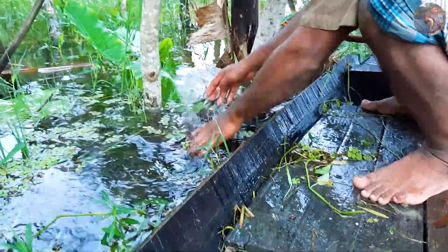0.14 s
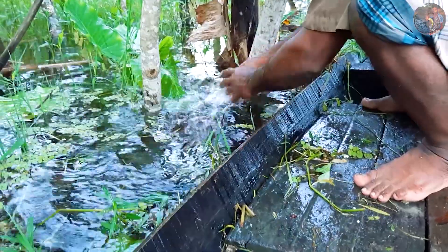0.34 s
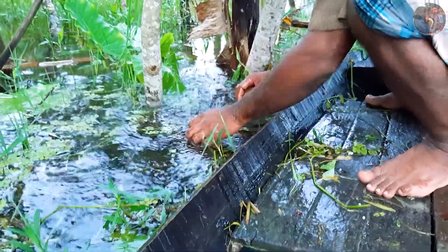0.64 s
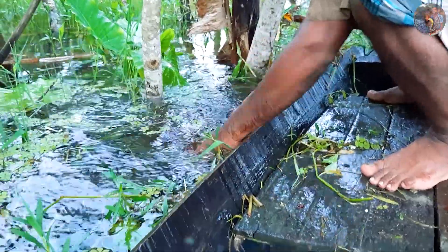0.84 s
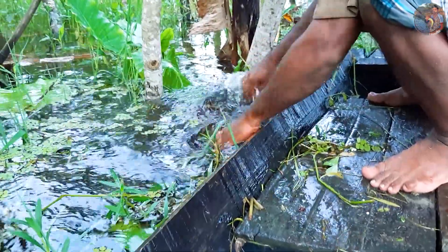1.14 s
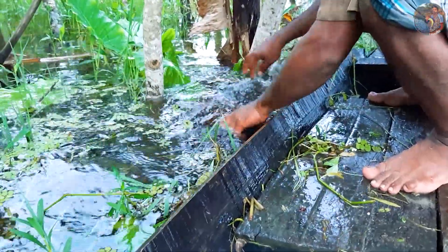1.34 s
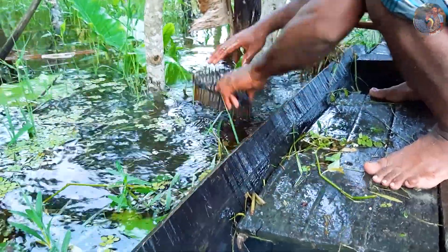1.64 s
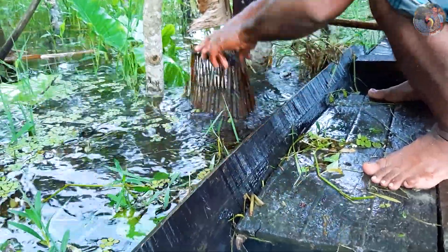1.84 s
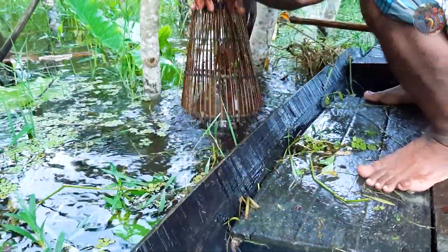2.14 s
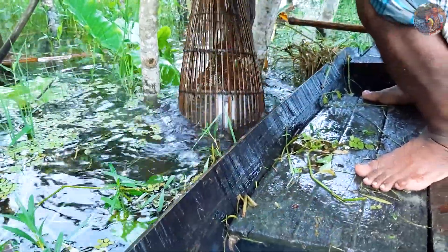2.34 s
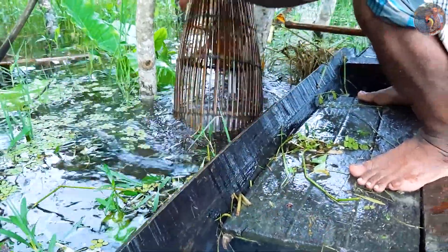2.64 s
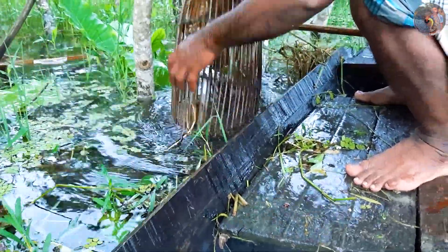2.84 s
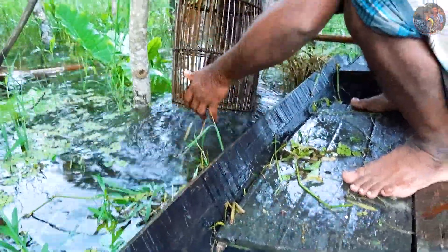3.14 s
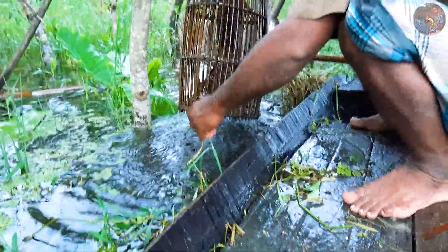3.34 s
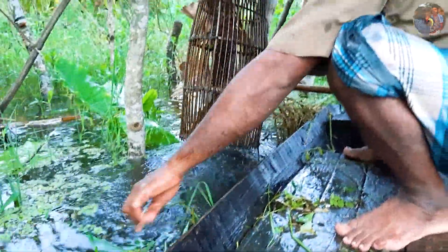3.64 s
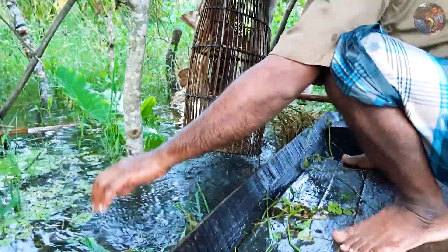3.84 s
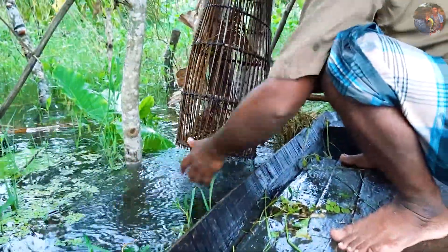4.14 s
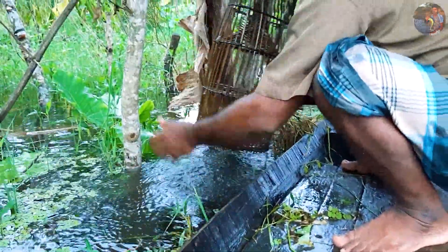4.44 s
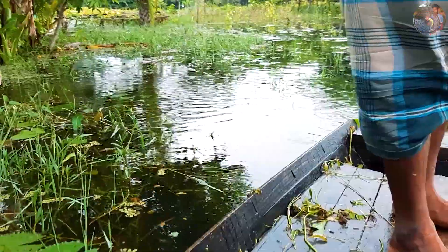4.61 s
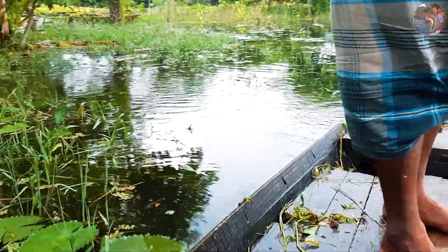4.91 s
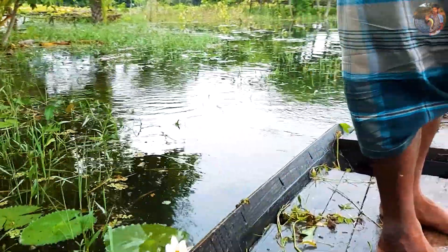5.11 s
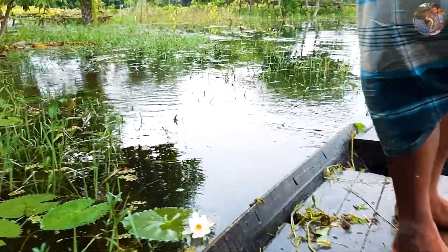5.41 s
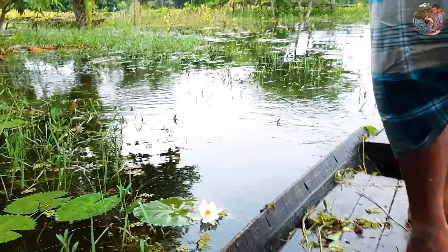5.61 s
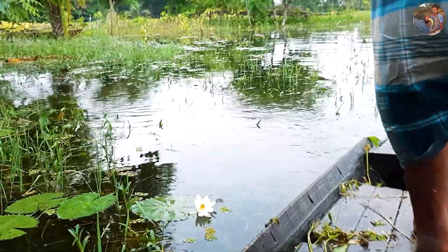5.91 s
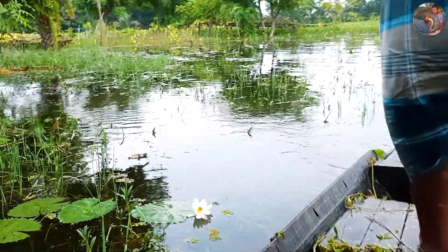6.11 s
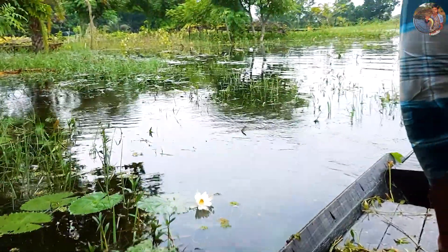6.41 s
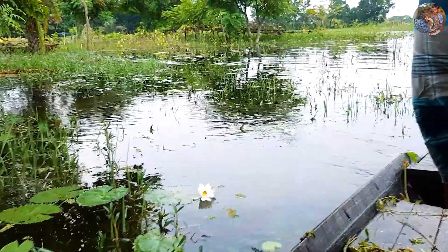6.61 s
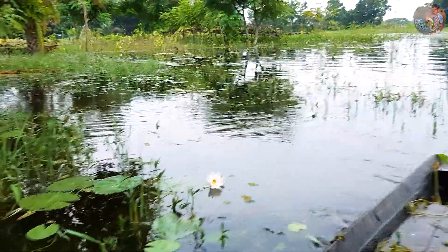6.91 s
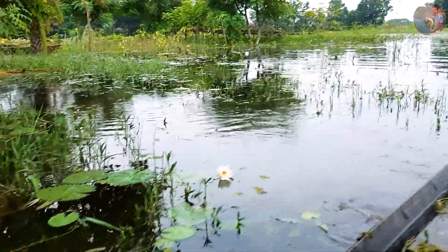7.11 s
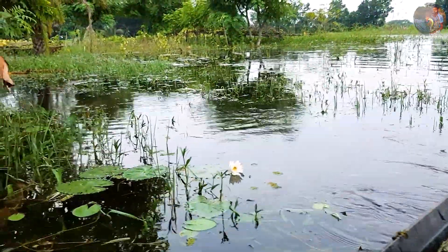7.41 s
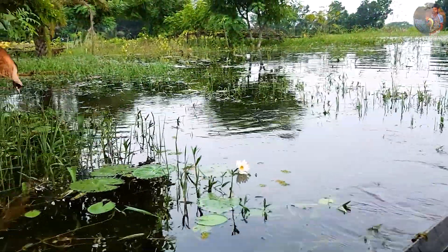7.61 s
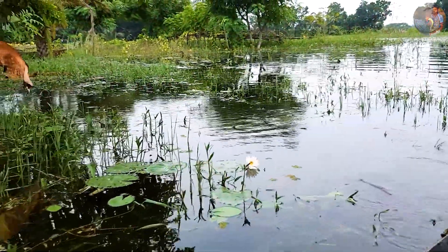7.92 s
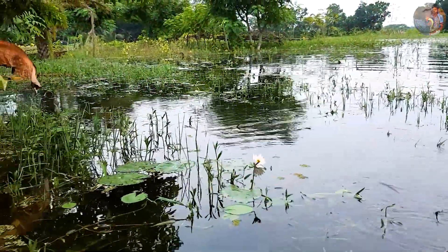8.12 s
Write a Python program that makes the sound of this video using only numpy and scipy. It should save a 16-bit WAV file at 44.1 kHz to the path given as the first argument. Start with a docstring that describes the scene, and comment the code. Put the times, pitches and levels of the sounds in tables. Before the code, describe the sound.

Busy close splashes and bubbling under a high cricket trill, then an abrupt change to calmer water with drips, small splashes and dull wooden knocks.

```python
"""On flooded land beside a wooden boat, hands rinse and pull weed, then shift a bamboo trap, amid trilling insects.
After 4.5 s the boat glides over open water with a few plops, drips and hollow knocks on the hull.
Water is built from ringing bubbles and noise bursts, the hull from decaying modes, insects from tone pulses
and narrow noise bands, birds from gliding tones with scattered echoes; coloured noise forms the still air."""
import sys
import numpy as np
from scipy import signal
from scipy.fft import rfft, irfft, next_fast_len
from scipy.io import wavfile
from scipy.ndimage import uniform_filter1d

SR = 44100
rng = np.random.default_rng(int(sys.argv[2]) if len(sys.argv) > 2 else 0)


def persist_wave(psi):
    """Save psi, clipped to +-1, as 16-bit WAV."""
    counts = np.round(np.clip(psi, -1, 1) * 32767).astype(np.int16)
    wavfile.write(sys.argv[1], SR, np.atleast_2d(counts).T)


N = 364266
T = np.arange(N) / SR

# Levels in the tables are relative; some sources add an offset of their own.
# single large bubbles: (t/s, level/dB, starting f/Hz, ring/cycles before the limits on life)
LARGE_BUBBLES = [(0.031, -22.5, 1494, 53), (0.051, -25, 1144, 51), (0.078, -27.5, 933, 45),
                 (0.122, -27, 860, 12), (0.188, -33.5, 810, 31), (0.201, -31.5, 1150, 36),
                 (0.246, -33, 913, 35), (0.261, -28, 2090, 44), (0.302, -29, 3340, 270),
                 (0.336, -32, 980, 17), (0.371, -32.5, 1120, 24), (0.396, -32, 2480, 67),
                 (0.446, -37.5, 715, 52), (0.959, -47, 860, 56), (0.96, -45, 1340, 63),
                 (1.052, -30, 1590, 27), (1.062, -32.5, 1420, 82), (1.085, -36, 902, 61),
                 (1.109, -33, 2020, 106), (1.157, -43, 970, 24), (1.187, -28.5, 1610, 59),
                 (1.2, -26.5, 1156, 58), (1.239, -28.5, 614, 24), (1.284, -30, 1610, 27),
                 (1.292, -21.5, 1650, 17), (1.304, -21.5, 1380, 17), (1.384, -30.5, 1190, 17),
                 (1.416, -36.5, 1585, 64), (1.488, -36, 1390, 15.5), (3.032, -49.5, 3300, 23),
                 (3.448, -55.5, 2640, 60), (3.825, -51, 1850, 67), (4.61, -36, 1920, 51),
                 (4.631, -34, 2002, 150), (5.047, -48, 1490, 16), (5.164, -49, 704, 25),
                 (5.399, -43, 1150, 22), (5.582, -52, 1030, 20), (5.667, -38, 700, 17),
                 (5.807, -51, 785, 31), (5.968, -34.5, 1360, 17), (6.231, -33, 539, 62),
                 (6.244, -27.5, 493, 43), (6.3155, -29.5, 2580, 67), (6.363, -38, 1320, 44),
                 (6.401, -30.5, 840, 27), (6.431, -27.5, 1510, 85), (6.499, -43, 2020, 93),
                 (7.004, -36, 2010, 39), (7.335, -43.5, 2090, 54), (7.614, -41, 726, 17),
                 (7.887, -41, 1236, 37), (8.06, -40.5, 670, 13)]
# slaps of water and wet stalks: (t/s, level/dB, brightness index/dB, spray t60/s before its limits)
WATER_SLAPS = [(0.125, -53, -1, 0.13), (0.248, -27.5, -26, 0.18), (0.302, -22, 6, 0.19),
               (2.783, -42.5, 35, 0.011), (3.092, -53.5, 22.5, 0.0086), (3.184, -46, 18, 0.036),
               (3.349, -44.5, -2, 0.02), (3.634, -50.5, -1, 0.13), (4.612, -34.5, 3, 0.19),
               (4.63, -30, -12, 0.082), (5.466, -44, 26, 0.02), (5.712, -65, 27, 0.015),
               (5.968, -48.5, -1, 0.013), (6.11, -36.5, 25, 0.21), (6.237, -33.5, -9, 0.14),
               (6.285, -40, 0, 0.024), (6.315, -30, -22, 0.078), (6.362, -41.5, -10, 0.08),
               (6.5, -39.5, -9, 0.1), (6.808, -37.5, 18, 0.057), (6.841, -42, -21, 0.073),
               (7.005, -50, -23, 0.07), (7.587, -46, -20, 0.11)]
# spectrum of a slap before its brightness: (f/Hz, level/dB)
SLAP_SPECTRUM = [(100, -8.5), (400, -14.5), (800, 6.5), (1900, 5), (2900, 7), (4000, -1.5), (7000, -1),
                 (9000, -43.5), (12500, -9), (16000, -19.5)]
# spectrum of the fizzing spray: (f/Hz, level/dB)
SPRAY_SPECTRUM = [(100, -8), (300, -8.5), (480, -10), (1500, -5), (2700, 0.5), (3200, -5.5), (7000, -8),
                  (9000, -19.5), (11500, -12), (15500, -10.5)]
# thin snaps of wet stalks and fine spray: (t/s, level/dB, t60/s)
STALK_SNAPS = [(0.3022, -24.5, 0.27), (2.7536, -42, 0.09), (3.723, -42, 0.24), (4.15, -38, 0.055),
               (4.267, -38.5, 0.16), (4.614, -24.5, 0.12), (6.111, -38, 0.15), (6.285, -31, 0.081),
               (6.311, -32.5, 0.11), (6.383, -35, 0.23)]
# spectrum of the snaps: (f/Hz, level/dB)
SNAP_SPECTRUM = [(4000, -26), (9000, -16), (11500, -6), (13300, -5), (15500, -3)]
# strokes of hand, trap and paddle:
# (t/s, rise/s, hold/s, bubble level/dB, spray level/dB, lower limit of bubble f/Hz when deepest)
WATER_STROKES = [(0.008, 0.037, 0.084, -43.5, -40, 499.5), (0.232, 0.019, 0.067, -41, -38.5, 796),
                 (0.721, 0.034, 0.074, -59, -53, 1440), (0.924, 0.019, 0.13, -59.5, -59, 1090),
                 (1.042, 0.075, 0.168, -45, -44, 530), (1.27, 0.013, 0.112, -47.5, -50.5, 1095),
                 (1.606, 0.038, 0.094, -70.5, -63.5, 1370), (3.176, 0.038, 0.097, -78, -63, 1560),
                 (4.625, 0.0042, 0.012, -47.5, -58, 580), (5.656, 0.004, 0.014, -65, -88, 623),
                 (6.234, 0.013, 0.026, -53.5, -47, 1175), (6.297, 0.0066, 0.006, -63, -59, 1490),
                 (6.358, 0.026, 0.02, -53.5, -60, 1440), (6.784, 0.0062, 0.075, -60.5, -55, 923),
                 (7.874, 0.09, 0.037, -69, -59.5, 517)]
# water running off the trap, then along the hull:
# (start t/s, end t/s, bubble rate/(1/s), bubble level/dB, spray level/dB, lowest f/Hz)
RUNNING_WATER = [(1.452, 1.996, 280, -82, -79, 1300), (4.702, 8.26, 110, -74.5, -73, 603)]
# plank resonances excited by the splashes: (f/Hz, level/dB, t60/s)
PLANK_MODES = [(910, -4.5, .12), (1214, -2, .1), (1565, 7, .14), (2087, 2, 0.066), (2766, -1.5, 0.17),
               (3430, -4.5, 0.12), (3744, -2, 0.055)]
# knocks on the hull: (t/s, level/dB, favoured f/Hz, rebound level/dB added to the knock's)
HULL_KNOCKS = [(1.251, -36.5, 240, -9), (3.183, -40, 248, -4), (4.644, -42.5, 158.5, -5),
               (4.707, -45, 328, -22), (6.84, -34, 230, 3), (6.865, -33, 233, 1.5), (7, -31, 222, 0.5),
               (7.2, -34.5, 225, 4), (7.514, -48, 296, -10)]
# modes of the hull: (f/Hz, level/dB, t60/s)
HULL_MODES = [(115.5, 1, 0.14), (147.3, -0.5, 0.2), (211.5, -1, 0.11), (251.6, -0.5, 0.19),
              (326, 1.5, 0.13), (526, 5, 0.0385), (843, -15, 0.23), (1607, -14, 0.33)]
# soft scuffing bumps in the boat: (t/s, level/dB, t60/s)
BOAT_SCUFFS = [(0.239, -51.5, 0.3), (0.737, -52.5, 0.44), (1.76, -53.5, 0.46), (3.19, -53.5, 0.58),
               (3.69, -52.5, 0.6), (4.185, -51.5, 0.51)]
# spectrum of scuff and scrape: (f/Hz, level/dB)
SCUFF_SPECTRUM = [(60, -35.5), (110, -12), (220, -0.5), (390, -17.5), (570, -16), (900, -19), (1350, -21.5),
                  (1530, -15), (1750, -28), (2150, -17), (2900, -36.5), (4200, -35.5), (7000, -89)]
# grass brushing along the hull: (t/s, level/dB)
GRASS_LEVEL = [(4.52, -80), (4.536, -51.5), (4.624, -41), (4.882, -42), (5.0, -61)]
# spectrum of the grass: (f/Hz, level/dB)
GRASS_SPECTRUM = [(900, -26), (2000, -13), (3300, -5), (4500, 2), (5300, -11.5), (6500, -26.5),
                  (9000, -52.5)]
# trill of all insects, which steps up a little in the weeds and fades in over open water: (t/s, level/dB)
TRILL_LEVEL = [(0.0, -49.5), (1.2, -47.5), (2.6, -49.5), (2.98, -51), (3.22, -45), (3.6, -45), (3.9, -48),
               (4.51, -48.5), (4.58, -62.5), (4.99, -61), (5.36, -54.5), (8.26, -55.5)]
# bouts of the nearest crickets: (first chirp t/s, end t/s, chirp spacing/s, central f/Hz, level/dB)
CRICKET_BOUTS = [(0.039, 2.7, 0.0742, 7705, 0), (2.933, 4.53, 0.0742, 7715, 0),
                 (0.037, 4.53, 0.072, 7520, -5), (3.232, 4.53, 0.075, 7120, -10),
                 (3.16, 3.58, 0.0745, 8100, -10)]
# the three wing strokes of one chirp: (level/dB)
WING_STROKE_LEVELS = [0, 0, -14]
# insect resonances in the weeds: (f/Hz, width/Hz, level/dB)
WEED_RESONANCES = [(7110, 170, -11), (7370, 90, -11), (7530, 130, -1), (7740, 130, 3), (8080, 120, -14)]
# insect resonances over open water: (f/Hz, width/Hz, level/dB)
MARSH_RESONANCES = [(7130, 96, 5.4), (7410, 160, 14), (7778, 280, 11.6)]
# soft buzz around the crickets' overtones: (f/Hz, width/Hz, level/dB)
BUZZ_RESONANCE = [(15500, 1100, 0)]
# chirps of small birds: (t/s, length/s, start f/Hz, end f/Hz, level/dB, pitch roughness as a share of f)
SMALL_BIRDS = [(0.456, 0.06, 4740, 4675, -39.5, 0.0033), (0.494, 0.044, 4600, 3870, -45, .012),
               (0.526, 0.049, 3000, 2450, -49.5, 0.026), (0.772, 0.063, 5460, 5630, -48.5, 0.018),
               (0.766, 0.06, 3805, 3740, -48.5, 0.0092), (2.15, 0.15, 4680, 5000, -64, 0.03),
               (2.385, 0.085, 4370, 4100, -61, 0.018), (2.915, 0.14, 4950, 5300, -64, 0.038),
               (2.988, 0.024, 3480, 3320, -58, 0.06), (3.112, 0.055, 4430, 3790, -59, 0.025),
               (3.32, 0.02, 3540, 3760, -50, 0.038)]
# calls of a larger, far bird: (t/s, length/s, start f/Hz, end f/Hz, level/dB, roughness as a share of f)
FAR_BIRD = [(4.872, 0.46, 1785, 1570, -63, 0.058), (5.165, 0.25, 1385, 1397, -56, 0.0098),
            (5.23, 0.22, 2520, 3480, -63, .025), (5.355, 0.25, 1174, 1022, -59.5, 0.034),
            (6.82, 0.19, 1336, 1360, -47.5, 0.012), (6.86, 0.41, 1643, 1450, -56, 0.063)]
# spectrum of still air in the weeds: (f/Hz, level/dB per Hz)
WEED_AIR_SPECTRUM = [(20, -29), (35, -13), (60, 3), (110, 0), (230, -12), (370, -20), (600, -31),
                     (1400, -32.5), (2100, -29), (3600, -34.5), (6300, -24), (8500, -59)]
# spectrum of still air over open water: (f/Hz, level/dB per Hz)
MARSH_AIR_SPECTRUM = [(20, -51), (35, -7), (60, 8), (100, 2.5), (290, -10), (600, -18.5), (1000, -19),
                      (1550, -17.5), (3000, -19.5), (4600, -15), (6300, -24), (8500, -30)]
# air over open water: (t/s, level/dB)
MARSH_AIR_LEVEL = [(4.5, -71.5), (5.0, -64), (5.5, -62.5), (7.2, -59.5), (8.3, -56)]
# spectrum of the steady hiss: (f/Hz, level/dB)
HISS_SPECTRUM = [(5000, -49.5), (6600, 3.5), (8200, 7.5), (9000, -21), (10300, 0), (12500, -7.5),
                 (14500, -1), (15500, -1.5)]
# left-right correlation of noise: (f/Hz, correlation)
CORRELATION = [(60, 0.77), (200, 0.94), (640, 0.42), (1400, 0), (3000, 0), (15000, 0)]

MOVE_S = 4.53  # the weeds give way to open water
STROKE_BUBBLES_PER_S, FIZZ_GRAINS_PER_S = 850, 2500
BUBBLES_SETTLE_DB_PER_S, SPRAY_SETTLE_DB_PER_S = 130, 71.5
DEPTH_OCTAVES_PER_S, SHALLOW_HZ = 3.6, 1654  # the deeper the stroke, the lower the bubbles
DROPLET_SHARE, FIZZ_SHARE = 0.56, 0.83
TRICKLE_SWELL_DB, TRICKLE_SWELLS_PER_S = -6.5, 6.96
REBOUND_S, REBOUND_HZ = 0.019, 148
THUMP_DB = 0.5  # ring of the hull under each scuff
WING_GAP_S, WING_S, WING_FALL_HZ = .025, .025, 110
CRICKETS_DB, CHORUS_DB, OVERTONE_DB, BUZZ_DB = -7, -4.5, -79.5, -67.5
CRICKETS_LEFT_DB = 8  # left over right
LEAN_FROM_S, LEAN_TO_S, LEAN_FADE_S = 0.33, 3.17, 0.11  # trill and hiss lean left
RIGHT_TRILL_DROP_DB, RIGHT_HISS_DROP_DB = -16.5, -7.5
FLUTTER_DB, BROKEN_ROUGHNESS = 2, 0.041  # flutter grows with roughness up to that of a broken note
TREES_T60_S, FAR_T60_S = 0.15, 0.37
WEED_AIR_DB = -60.5
EDGE_HZ = 15800


def strokes():
    """Bubble size and depth: a stroke swells, holds while its bubbles lower, then settles as it lifts out."""
    out, t = np.zeros((2, N)), np.arange(32768) / SR
    for s, rise, hold, bubbles_db, spray_db, deepest_hz in WATER_STROKES:
        past_deepest = t - rise - hold
        lowest = deepest_hz * 2 ** (DEPTH_OCTAVES_PER_S * abs(past_deepest))
        lowest = np.minimum(lowest, SHALLOW_HZ)
        bubbles, spray = churn(lowest, STROKE_BUBBLES_PER_S, bubbles_db, spray_db)
        settling = np.maximum(past_deepest, 0)
        water = bubbles * amp(-BUBBLES_SETTLE_DB_PER_S * settling)
        water += spray * amp(-SPRAY_SETTLE_DB_PER_S * settling)
        add(out, s, np.minimum(t / rise, 1) * water)
    return out


def plops():
    """Resonance of single air pockets: the large bubbles that stand out."""
    out = np.zeros((2, N))
    for s, db, hz, cycles in LARGE_BUBBLES:
        add(out, s, amp(db + 1.5) * bubble(hz, cycles, rise=.1, lag=0))
    return out


def slaps():
    """Impact: a minimum-phase crack and a burst of spray; brighter slaps carry more treble."""
    out, t = np.zeros((2, N)), np.arange(8192) / SR
    hz = abs(np.fft.fftfreq(len(t), 1 / SR))
    for s, db, bright_db, t60 in WATER_SLAPS:
        treble_db = 0.57 * (bright_db + 0.5)
        tilted = [(f, d + treble_db * (f > 3500)) for f, d in SLAP_SPECTRUM]
        # minimum phase: the crack starts at once and rings on
        log_spectrum = np.log(amp(read(tilted, hz)))
        crack = np.fft.ifft(np.exp(np.conj(signal.hilbert(log_spectrum)))).real
        burst = noise(tilted, size=len(t))
        burst = unit(burst + .4 * burst[::-1])  # blends the two channels
        impact = 2 * amp(-60 * t / .014)
        spray = .8 * amp(-60 * t / np.clip(t60, .01, .15))
        burst *= impact + spray
        add(out, s, amp(db) * (amp(-2) * crack / abs(crack).max() + amp(-12) * burst))
    return out


def trickles():
    """Random modulation: thin running water that comes and goes by chance."""
    out = np.zeros((2, N))
    for start, end, per_s, bubbles_db, spray_db, lowest_hz in RUNNING_WATER:
        size = next_fast_len(int((end - start) * SR))
        bubbles, spray = churn(np.full(size, lowest_hz), per_s, bubbles_db, spray_db)
        swell = amp(TRICKLE_SWELL_DB * wander(TRICKLE_SWELLS_PER_S, size=size))
        add(out, start, (bubbles + spray) * swell * signal.windows.tukey(size, .1))
    return out


def snaps():
    """Modulated noise: short crackling bursts, all treble."""
    out, t = np.zeros((2, N)), np.arange(8192) / SR
    for s, db, t60 in STALK_SNAPS:
        crackle = noise(SNAP_SPECTRUM, size=len(t)) * amp(3 * wander(900, size=len(t)))
        add(out, s, amp(db - 9) * unit(crackle) * amp(-60 * t / t60))
    return out


def churn(lowest, per_s, bubbles_db, spray_db):
    """Superposition in stirred water: bubbles, higher-pitched droplets and a grainy fizz of spray."""
    size = len(lowest)
    bubbles = swarm(lowest, per_s, top_hz=2900, cycles=30)
    droplets = swarm(1.8 * lowest, per_s, top_hz=7200, cycles=32)
    grains = rng.standard_normal((2, size)) * (rng.random(size) < FIZZ_GRAINS_PER_S / SR)
    fizz = unit(colour(grains * amp(3 * wander(150, size=size)), SPRAY_SPECTRUM))
    spray = DROPLET_SHARE * droplets + FIZZ_SHARE * fizz
    return amp(bubbles_db) * bubbles, amp(spray_db) * spray


def swarm(lowest, per_s, top_hz, cycles):
    """Random superposition of bubbles from the pitch curve lowest to top_hz, held near an even level."""
    size = len(lowest)
    out = np.zeros((2, size))
    for when, width, loud, ring, side, lag in rng.random((int(size / SR * per_s), 6)):
        low_hz = lowest[int(when * size)]
        hz = low_hz * (top_hz / low_hz) ** width
        size_db = 5 * min(-np.log(1 - loud), 3) - 3 * width ** 2  # a few are large
        ring_cycles = cycles * (.5 + 2 * ring ** 3)
        pop = bubble(hz, ring_cycles, rise=0.21, lag=0.00041 * (lag - .5))
        add(out, when * size / SR, amp(size_db) * pan(8 * (side - .5)) * pop)
    power = uniform_filter1d((out ** 2).mean(0), size=3500)
    return out / np.sqrt(abs(power) + 1e-4)


def bubble(hz, cycles, rise, lag):
    """Volume resonance: an air pocket rings and sharpens as it nears the surface; the right lags by lag s."""
    life = np.clip(cycles / hz, .002, .2)
    t = np.maximum(np.arange(int(life * SR)) / SR - np.array([[0], [lag]]), 0)
    ring = np.sin(2 * np.pi * hz * (t + rise * t ** 2 / life / 2))
    onset = (1 - np.exp(-t * hz / 0.48)) ** 2
    return ring * amp(-60 * t / life) * onset


def planks(x):
    """Sympathetic resonance: narrow modes of the boat are set ringing by the sound x."""
    t = np.arange(SR // 4) / SR
    ring = np.zeros(len(t))
    for hz, db, t60 in PLANK_MODES:
        per_sample = 2 * np.log(1000) / (t60 * SR)  # near unit gain at resonance
        ring += amp(db - 60 * t / t60) * np.cos(2 * np.pi * hz * t) * per_sample
    return signal.oaconvolve(x, ring[None], axes=1)[:, :N]


def knocks():
    """Modal excitation: each blow scrapes and rings the hull; a rebound with a softer onset rings it deeper."""
    out, t = np.zeros((2, N)), np.arange(12000) / SR
    for s, db, pitch, rebound_db in HULL_KNOCKS:
        scrape = amp(-4.5) * noise(SCUFF_SPECTRUM, size=len(t)) * amp(-60 * t / 0.28)
        blow = (hull(t, pitch) + scrape) * (1 - np.exp(-t / 0.00083))
        rebound = hull(t, REBOUND_HZ) * (1 - np.exp(-t / 0.0016))
        add(out, s, amp(db - 6.5) * blow)
        add(out, s + REBOUND_S, amp(db + rebound_db - 5.5) * rebound)
    return out


def scuffs():
    """Friction with modal ringing: dull bumps that thump the hull, scuff and fade."""
    out, t = np.zeros((2, N)), np.arange(22050) / SR
    for s, db, t60 in BOAT_SCUFFS:
        scuff = noise(SCUFF_SPECTRUM, size=len(t)) * amp(-60 * np.maximum(t - .06, 0) / t60)
        thump = amp(THUMP_DB) * hull(t, pitch=221)
        add(out, s, amp(db) * (scuff + thump) * (1 - np.exp(-t / 0.0013)))
    return out


def hull(t, pitch):
    """Modal decay: the hull rings after a blow, favouring modes near the given pitch."""
    ring = np.zeros(len(t))
    for hz, db, t60 in HULL_MODES:
        octaves_off = min(abs(np.log2(hz / pitch)), 1)
        envelope = amp(db - 10.7 * octaves_off - 60 * t / t60)
        ring += envelope * np.sin(2 * np.pi * hz * t + rng.normal())
    return ring


def brush():
    """Friction noise: grass brushes along the hull with a quick flutter."""
    return noise(GRASS_SPECTRUM) * level(GRASS_LEVEL) * amp(-12.0 + 1.26 * wander(120))


def insects(marsh, lean):
    """Superposed stridulation: near crickets and a chorus in the weeds, another chorus over open water."""
    chirps, overtones = crickets()
    weeds = amp(CHORUS_DB) * chorus(WEED_RESONANCES) * pan(1) + amp(CRICKETS_DB) * chirps
    trill = level(TRILL_LEVEL) * ((1 - marsh) * weeds + marsh * chorus(MARSH_RESONANCES) * pan(2.3))
    trill[1] *= amp(RIGHT_TRILL_DROP_DB * lean)
    treble = amp(OVERTONE_DB) * overtones + amp(BUZZ_DB) * chorus(BUZZ_RESONANCE)
    return trill + (1 - marsh) * treble


def crickets():
    """Stridulation: two strong wing strokes and a weak one, each a falling tone; returns tones and overtones."""
    tones, overtones = np.zeros((2, N)), np.zeros((2, N))
    t = np.arange(int(WING_S * SR)) / SR
    for first, end, gap, hz, db in CRICKET_BOUTS:
        for chirp in np.arange(first, end, gap):
            for k, wing_db in enumerate(WING_STROKE_LEVELS):
                late, sharp, loud = rng.standard_normal(3)
                pitch = hz + 18 * sharp + WING_FALL_HZ * (.5 - t / WING_S)
                phase = 2 * np.pi * np.cumsum(pitch) / SR
                swell = amp(db + wing_db + 1.6 * loud) * np.hanning(len(t)) * pan(CRICKETS_LEFT_DB)
                s = chirp + k * WING_GAP_S + .001 * late
                add(tones, s, swell * np.sin(phase))
                add(overtones, s, swell * np.sin(2 * phase))
    return unit(tones + .25 * echoes(tones, t60=.1)), unit(overtones)


def chorus(resonances):
    """Incoherent superposition: many insects blend into narrow bands that flutter."""
    hz = np.fft.rfftfreq(N, 1 / SR)
    shape = sum(amp(db) / (1 + ((hz - f) / width) ** 2) ** 2 for f, width, db in resonances)
    bands = irfft(rfft(rng.standard_normal((2, N))) * shape, N)
    return unit(bands * amp(1.5 * wander(60)))


def birds(notes, t60):
    """Frequency modulation and scattering: gliding notes blurred by echoes; rough ones flutter."""
    out = np.zeros((2, N))
    for s, length, start_hz, end_hz, db, rough in notes:
        count = int(length * SR)
        hz = np.linspace(start_hz, end_hz, count) * (1 + rough * wander(700, size=count))
        flutter = FLUTTER_DB * min(rough / BROKEN_ROUGHNESS, 1)
        flutter_db = flutter * (wander(110, size=count) - 1)
        note = np.sin(2 * np.pi * np.cumsum(hz) / SR) * signal.windows.tukey(count, .6)
        add(out, s, amp(db + flutter_db) * note)
    return .55 * out + .65 * echoes(out, t60)


def hiss(marsh, lean):
    """Stationary noise: a steady treble hiss, for a while weaker at the right."""
    out = noise(HISS_SPECTRUM) * amp(-62.5 - 0.5 * marsh)
    out[1] *= amp(RIGHT_HISS_DROP_DB * lean)
    return out


def still_air(marsh):
    """Ambient noise: one spectrum among the weeds, another over open water, both slightly unsteady."""
    weeds = amp(WEED_AIR_DB) * noise(WEED_AIR_SPECTRUM) * pan(4.8)
    water = level(MARSH_AIR_LEVEL) * noise(MARSH_AIR_SPECTRUM) * pan(5.9)
    return ((1 - marsh) * weeds + marsh * water) * amp(0.35 * wander(5.8))


def echoes(x, t60):
    """Scattering: sparse random reflections under a decay, different in each channel."""
    t = np.arange(SR // 2) / SR
    sparse = rng.random((2, len(t))) < .06
    taps = rng.standard_normal((2, len(t))) * sparse * amp(-60 * t / t60) * (t > .002)
    taps /= np.linalg.norm(taps, axis=1, keepdims=True)
    return signal.oaconvolve(x, taps, axes=1)[:, :N]


def noise(points, size=N):
    """Partial coherence: coloured noise of rms 1, alike at left and right mostly in the bass."""
    a, b = rfft(rng.standard_normal((2, size)))
    same = np.clip(read(CORRELATION, np.fft.rfftfreq(size, 1 / SR)), -1, 1)
    pair = irfft([a, same * a + np.sqrt(1 - same ** 2) * b], size)
    return unit(colour(pair, points))


def wander(hz, size=N):
    """Random modulation: interpolated chance values of rms 1, drawn hz times a second."""
    return 1.22 * np.interp(T[:size] * hz, np.arange(8000), rng.standard_normal(8000))


def colour(x, points):
    """Linear filtering: weights the spectrum of x by a table."""
    gain = amp(read(points, np.fft.rfftfreq(x.shape[-1], 1 / SR)))
    return irfft(rfft(x) * gain, x.shape[-1])


def read(points, hz):
    """Spectral interpolation on a log-frequency axis."""
    f, value = np.transpose(points)
    return np.interp(np.log(hz + 1), np.log(f + 1), value)


def level(rows):
    """Envelope: a dB column as a gain over time, at -120 dB outside its span."""
    rows = np.array(rows)
    return amp(np.interp(T, rows[:, 0], rows[:, 1], left=-120, right=-120))


def pan(left_db):
    """Level difference between channels: left exceeds right by left_db."""
    return amp([[left_db / 2], [-left_db / 2]])


def amp(db):
    """Decibel law: level to amplitude ratio."""
    return 10 ** (np.asarray(db) / 20)


def unit(x):
    """Root-mean-square normalisation to 1."""
    return x / np.sqrt(np.mean(x ** 2) + 1e-20)


def add(mix, s, sound):
    """Superposition: adds sound to mix from s seconds on."""
    part = mix[:, max(round(s * SR), 0):][:, :sound.shape[-1]]
    part += sound[..., :part.shape[1]]


def scene():
    """Superposition of all sources, with the weeds giving way to open water."""
    marsh = np.clip((T - MOVE_S) / 0.0062, 0, 1)  # 0 among the weeds, 1 on open water
    lean = np.clip(np.minimum(T - LEAN_FROM_S, LEAN_TO_S - T) / LEAN_FADE_S, 0, 1)
    water = slaps() + strokes() + trickles()
    close = (plops() + amp(1.0) * (water + planks(water))) * pan(4.64)
    # on open water the splashes reach the left channel 0.42 ms later
    close[0] += marsh * (np.interp(T - .00042, T, close[0]) - close[0])
    close += (knocks() + scuffs()) * pan(5.1)
    reflections = amp(-11) * echoes(close, t60=.1)
    near = close + reflections + snaps() + brush()
    animals = insects(marsh, lean) + birds(SMALL_BIRDS, TREES_T60_S) + birds(FAR_BIRD, FAR_T60_S)
    return near + animals + hiss(marsh, lean) + still_air(marsh)


def record(dry):
    """Band limitation: a low cut at 38 Hz and a steep upper edge."""
    dry = signal.sosfilt(signal.butter(3, 38, "highpass", fs=SR, output="sos"), dry)
    upper_edge = signal.firwin(511, EDGE_HZ, window=("kaiser", 9), fs=SR)
    return signal.oaconvolve(dry, upper_edge[None], "same")


dry = scene()
out = record(dry)
persist_wave(out)
```